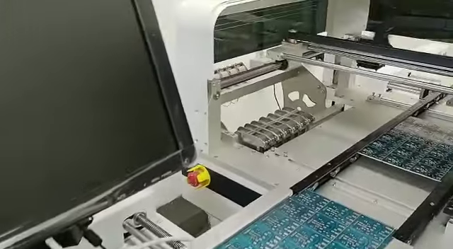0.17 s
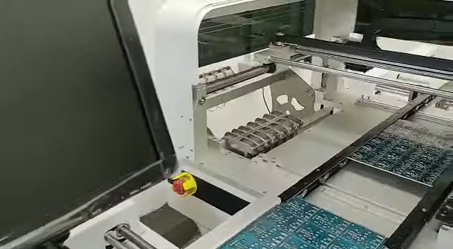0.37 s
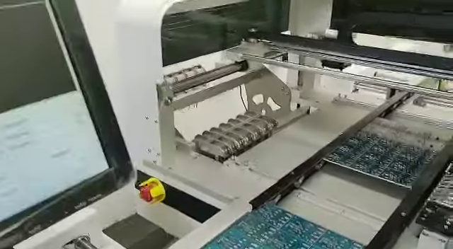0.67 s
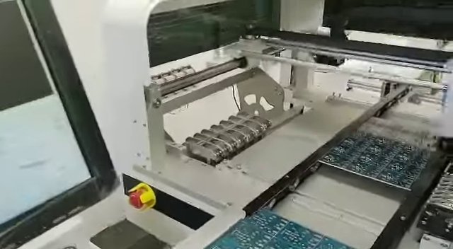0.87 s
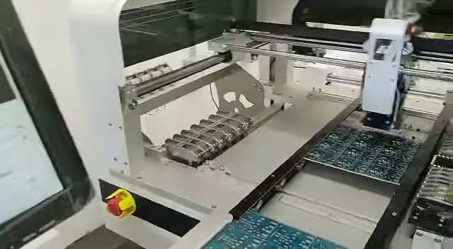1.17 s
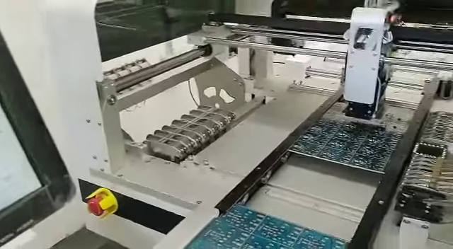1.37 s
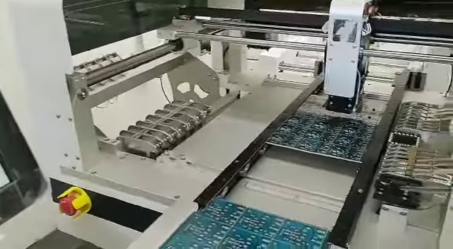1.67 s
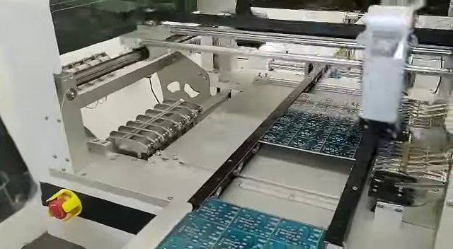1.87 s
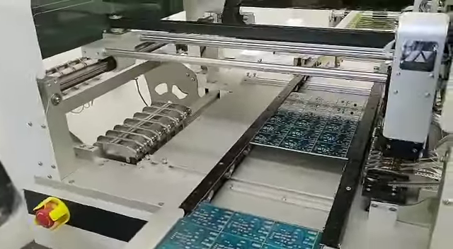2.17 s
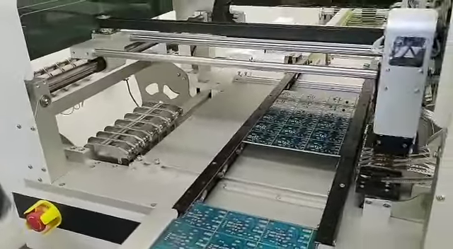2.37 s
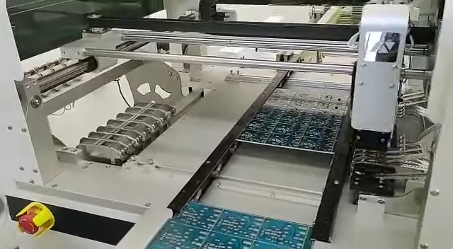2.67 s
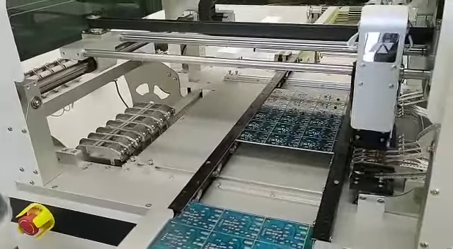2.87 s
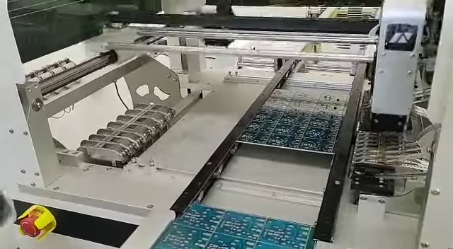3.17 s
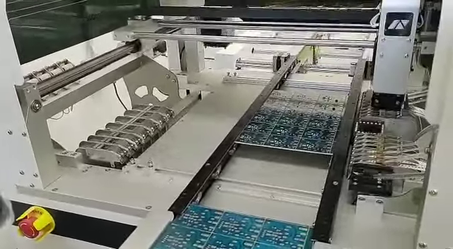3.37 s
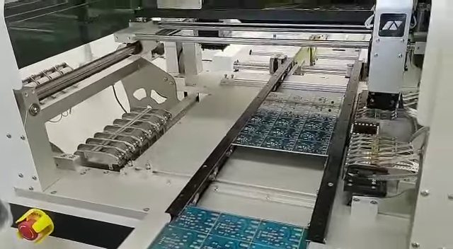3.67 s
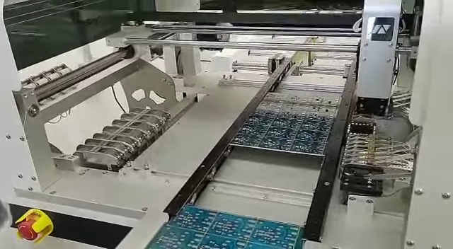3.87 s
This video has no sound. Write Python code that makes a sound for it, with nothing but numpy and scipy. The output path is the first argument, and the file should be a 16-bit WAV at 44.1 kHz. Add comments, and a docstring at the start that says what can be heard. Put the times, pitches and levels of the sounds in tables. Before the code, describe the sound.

A pick-and-place machine whirs through quick moves, with jolts and ratcheting rattles.

```python
"""A pick-and-place machine at work in a live workshop, on one microphone at its open front.
Its head makes five quick moves: the belt drive whines up and down, the guide bearings roll, and the
frame booms whenever the whine sweeps through its low resonances. Hard starts and stops jolt the head,
and braking groans. Twice a ratchet parts feeder rattles. Suction nozzles hiss, small valves tick,
and fans hum in the background."""
import sys
import numpy as np
from scipy import signal
from scipy.fft import rfft, irfft, next_fast_len
from scipy.io import wavfile
from scipy.ndimage import map_coordinates

SR = 44100
rng = np.random.default_rng(int(sys.argv[2]) if len(sys.argv) > 2 else 0)


def output_pcm(signal):
    """Save a mono or channel-first signal as 16-bit PCM at the path in sys.argv[1].

    Samples are clipped to [-1, 1] before scaling.
    """
    pcm = np.clip(np.atleast_2d(signal).T, -1, 1) * 32767
    wavfile.write(sys.argv[1], SR, np.round(pcm).astype(np.int16))


N = 176400
T = np.arange(N) / SR

# head moves (start [s], length [s], top belt-tooth rate [Hz], whine [dB], its lift in braking [dB],
# rolling [dB], frame boom [dB], swish [dB])
MOVES = [(-.112, .35, 1320, -44.5, -1, -43, -36.5, -71.5), (.855, .28, 1102, -49, 2, -46.5, -37, -69.5),
         (1.69, .54, 1642, -40.5, 3.5, -41.5, -36.5, -67.5),
         (3.054, .55, 1723, -38, 2, -40.5, -35.5, -67.5), (3.86, 0.36, 1535, -41, 0, -40, -31, -59)]


def amp(db):
    """Decibels to gain."""
    return 10 ** (np.asarray(db) / 20)


def unit(x):
    """Scale to rms 1."""
    return x / np.sqrt(np.mean(x ** 2) + 1e-20)


def along(points, hz):
    """Read (frequency [Hz], value) points on a log axis."""
    freqs, values = np.transpose(points)
    return np.interp(np.log(hz + 1), np.log(freqs + 1), values)


def wobble(rate):
    """A smooth random curve, rate knots a second."""
    return map_coordinates(rng.standard_normal(int(N * rate / SR) + 4), [T * rate])


def filtered(x, response):
    """x through a complex frequency response."""
    size = next_fast_len(N + SR // 2)
    return irfft(rfft(x, size) * response(np.fft.rfftfreq(size, 1 / SR)), size)[:N]


def coloured(x, points):
    """x through a (frequency [Hz], gain [dB]) curve."""
    return filtered(x, lambda hz: amp(along(points, hz)))


def noise(points):
    """Coloured noise of rms 1."""
    return unit(coloured(rng.standard_normal(N), points))


def resonate(x, modes):
    """x through a body's resonances (centre [Hz], width [Hz], gain [dB])."""
    return filtered(x, lambda f: sum(amp(db) * 1j * f * width / (hz * hz - f * f + 1j * f * width)
                                     for hz, width, db in modes))


def progress(start, length):
    """Ramp from 0 to 1 over an event."""
    return np.clip((T - start) / length, 0, 1)


def in_room(x, wet_db):
    """Direct sound plus the workshop's tail 4 ms behind it, at about the same total power."""
    # the workshop's decay (frequency [Hz], t60 [s])
    decay = [(100, 0.93), (250, 0.87), (1500, 1), (3000, 0.93), (7000, 0.6)]
    hz, t, spectrum = signal.stft(rng.standard_normal(SR), SR, nperseg=256)
    tail = signal.istft(spectrum * amp(-60 * t / along(decay, hz)[:, None]), SR, nperseg=256)[1]
    wet = signal.fftconvolve(x, np.pad(tail, (SR // 250, 0)) / np.linalg.norm(tail))[:N]
    return (x + amp(wet_db) * wet) / np.hypot(1, amp(wet_db))


def fans(rush_db=-53.5, waver_db=3.5, drift_rad=0.61):
    """Room tone: steady ventilation noise with unsteady motor lines."""
    # rush of the fans (frequency [Hz], relative level [dB])
    rush = [(15, -64.5), (25, -39.5), (82, -10), (209, -8), (242, -9.5), (392, -19), (431, -18),
            (605, -22.5), (650, -15.5), (699, -17), (890, -21.5), (1790, -30), (3700, -40), (8000, -55),
            (10400, -62), (17600, -120)]
    # motor lines (frequency [Hz], level [dB])
    hum = [(145, -60), (167, -60.5), (188, -64), (237, -57)]
    lines = sum(amp(db + waver_db * wobble(10)) * np.sin(2 * np.pi * hz * T + drift_rad * wobble(10.27))
                for hz, db in hum)
    return amp(rush_db) * noise(rush) + np.sqrt(2) * lines


def leak():
    """Leaking air: a narrow, high hiss swells and fades."""
    # the thin jet (start [s], length [s], centre [Hz], width [Hz], level [dB])
    jet = (1.7, 2.1, 7452.5, 451, -84.5)
    start, length, hz, width_hz, db = jet
    band = [(hz, width_hz, 0)]
    swell = np.sqrt(np.abs(np.sin(np.pi * progress(start, length))))
    return amp(db) * swell * unit(resonate(resonate(rng.standard_normal(N), band), band))


def nozzles(flicker_db=0.5):
    """Suction nozzles hiss, opening as parts are picked."""
    # course of the hiss (time [s], level [dB])
    flow = [(0, -82), (1.7, -76.5), (2.42, -61), (2.47, -49), (2.8, -46.5), (3.0, -51.5), (3.3, -41.5),
            (3.62, -52), (3.68, -48), (3.82, -46), (3.9, -39), (4, -39)]
    # its spectrum (frequency [Hz], relative level [dB])
    colour = [(25, -56), (150, 4), (400, 2.5), (1000, -4), (1450, 5), (1900, -8), (2400, -3), (2770, -4),
              (3100, -10), (3800, -12.5), (6000, -20), (7800, -31)]
    return amp(np.interp(T, *np.transpose(flow)) + flicker_db * wobble(150)) * noise(colour)


def valves(relative_width=0.36):
    """Small valves click: short bursts of band noise with little room on them."""
    # clicks (time [s], level [dB], centre [Hz], t60 [s])
    ticks = [(1.525, -58, 5910, 0.033), (1.643, -60, 3230, 0.024), (1.682, -59.5, 3000, 0.052),
             (1.735, -60.5, 4500, 0.076), (1.748, -57.5, 4130, 0.041), (2.283, -58.5, 5000, 0.034),
             (2.886, -54, 7040, 0.023), (3.667, -56.5, 5000, 0.045), (3.758, -64, 5960, 0.027)]
    out = np.zeros(N)
    for start, db, hz, t60 in ticks:
        band = unit(resonate(rng.standard_normal(N), [(hz, relative_width * hz, 0)]))
        out += (T >= start) * amp(db - 60 * np.abs(T - start) / t60) * band
    return in_room(out, wet_db=-11.5)


def feeder(tooth_hz=41.6, ring_hz=1440, width_hz=175, scatter_s=.0004, spread_db=1.9, contact_s=0.0047):
    """Each ratchet tooth makes three contacts that click, scrape and ring the feeder's metal."""
    # feeder runs (start [s], length [s], first level [dB], last level [dB])
    runs = [(2.437, .385, -41, -39.5), (3.058, .36, -38, -34)]
    # contacts of one tooth (position [share of the cycle], level [dB])
    contacts = [(0, 2), (0.332, -7.5), (0.702, -10)]
    # the metal's higher modes (centre [Hz], width [Hz], gain [dB])
    upper_modes = [(2745, 73, 3), (3380, 100, -4), (5080, 92, -16.5), (6250, 110, -15.5)]
    # broad clatter (frequency [Hz], relative level [dB])
    clatter_colour = [(25, -61), (80, 8), (170, 19), (300, 12), (500, 15), (1000, 14), (2000, -18),
                      (4000, -24), (7500, -31.5)]
    # the pawl's dry click (frequency [Hz], relative level [dB])
    pawl_colour = [(25, -59), (1500, -23.5), (3300, 12), (4500, -1), (6400, 2), (7800, -15)]
    main_mode = [(ring_hz, width_hz, 0)]
    contact_decay = np.exp(-T[:SR // 40] / contact_s)
    metal, clicks = np.zeros((2, N))
    for start, length, first_db, last_db in runs:
        blows = np.zeros(N)
        for share, db in contacts:
            times = start + (np.arange(round(length * tooth_hz)) + share) / tooth_hz
            timing, strength = rng.standard_normal((len(times), 2)).T
            blows[((times + scatter_s * timing) * SR).astype(int)] += amp(db + spread_db * strength)
        scrape = signal.fftconvolve(blows, contact_decay)[:N] * rng.standard_normal(N)
        snap = signal.fftconvolve(blows ** 2, contact_decay)[:N] * rng.standard_normal(N)
        ring = unit(resonate(resonate(blows, main_mode), main_mode))
        upper_ring = amp(-16) * unit(resonate(scrape, upper_modes))
        clatter = amp(-10.5) * unit(coloured(scrape, clatter_colour))
        grip = np.clip(0.43 + (T - start) / 0.11, 0, 1)  # the drive takes hold
        level = amp(np.interp(T, [start, start + length], [first_db, last_db]))
        drive = grip * np.sqrt(length * SR / N) * level  # the root refers the rms to the run's length
        metal += drive * (ring + upper_ring + clatter)
        clicks += drive * amp(-24) * unit(coloured(snap, pawl_colour))
    return clicks + in_room(metal, wet_db=-4)


def gantry(waver_db=2):
    """The gantry and its rail ring in brief swells around a stop."""
    # shudders (start [s], length [s], pitch [Hz], level [dB])
    shudders = [(1.024, 0.45, 105.6, -50.5), (1.06, 0.03, 400, -38.5), (1.18, 0.048, 1025, -40),
                (1.532, 0.1, 94.6, -62), (3.525, 0.02, 435, -29)]
    ring = sum(amp(db) * np.sin(np.pi * progress(start, length)) * np.sin(2 * np.pi * hz * T)
               for start, length, hz, db in shudders)
    return in_room(ring * amp(waver_db * wobble(25.9)), wet_db=-14.5)


def jolts(flutter_db=3):
    """A hard start or stop rattles the head's loose parts."""
    # jolts (time [s], level [dB], t60 [s])
    knocks = [(0.937, -42.5, 0.034), (1.062, -36, 0.16), (1.106, -34, 0.16), (1.167, -41, .15),
              (3.524, -43, 0.14)]
    # modes of the loose parts (centre [Hz], width [Hz], gain [dB])
    modes = [(306, 17, 0.5), (440, 60, -13.5), (655, 99, -7.5), (769, 59, -3), (954, 110, 1.5),
             (1460, 570, -9), (1850, 53, 0), (2370, 900, -31)]
    # dulling of the rattle (frequency [Hz], gain [dB])
    dulling = [(25, -14.5), (200, 8.5), (2600, -6.5), (4000, -26), (8000, -48)]
    force = sum((T >= start) * amp(db - 60 * np.abs(T - start) / t60) for start, db, t60 in knocks)
    rattle = unit(coloured(resonate(rng.standard_normal(N), modes), dulling))
    return in_room(force * amp(flutter_db * wobble(204.7)) * rattle, wet_db=0.5)


def braking_groans(from_hz=480, sink_s=.036, swell_s=0.076, jitter=.09, rough_db=2):
    """Braking groans: a tone sinks onto a low resonance of the frame, swells and rings out."""
    # groans (start [s], level [dB], t60 [s], final pitch [Hz])
    groans = [(.172, -31.5, 0.52, 231.4), (1.058, -34.5, 0.18, 279.2), (2.118, -37, 0.13, 240),
              (3.508, -32, 0.34, 238.4)]
    out = np.zeros(N)
    for start, db, t60, end_hz in groans:
        age = np.maximum(T - start, 0)
        hz = end_hz + (from_hz - end_hz) * np.exp(-age / sink_s)
        swell = np.minimum(age / swell_s, 1) * amp(db - 60 * np.maximum(age - swell_s, 0) / t60)
        out += swell * np.sin(2 * np.pi * np.cumsum(hz * (1 + jitter * wobble(120))) / SR)
    return in_room(out * amp(rough_db * wobble(51)), wet_db=-9.0)


def head_speed(start, length, rounding=.45):
    """Share of top speed during a move: accelerate, then brake."""
    done = progress(start, length)
    triangle = 1 - np.abs(2 * done - 1)
    return np.abs(rounding * np.sin(np.pi * done) + (1 - rounding) * triangle)


def under_way(speed):
    """Gate that opens once the head is moving."""
    return np.clip(8 * speed - .5, 0, 1)


def belt_swish():
    """The belt stirs the air, louder with speed."""
    # stirred air (frequency [Hz], relative level [dB])
    colour = [(25, -62), (2500, -29), (4200, 7.5), (6000, -0.5), (7400, 2), (8200, -10.5)]
    level = sum(amp(db) * np.sqrt(head_speed(start, length)) for start, length, *_, db in MOVES)
    return in_room(level * noise(colour), wet_db=0.5)


def bearings(growth=0.86, rise_db=4.5, grain_db=3.5):
    """The guide bearings' grainy roll grows with speed and is louder late in a move."""
    # rolling noise (frequency [Hz], relative level [dB])
    colour = [(25, -58), (60, -8), (150, -18.5), (230, 6), (330, -9), (450, -10), (600, -6), (1000, -4.5),
              (1450, -5), (2000, -6), (2700, -11.5), (3700, -28.5), (5500, -34.5), (7500, -61)]
    level = np.zeros(N)
    for start, length, *_, roll_db, _, _ in MOVES:
        speed = head_speed(start, length)
        late = progress(start, length) - .5
        level += amp(roll_db + rise_db * late) * under_way(speed) * speed ** growth
    return in_room(level * noise(colour) * amp(grain_db * wobble(220)), wet_db=0.5)


def frame_boom(shake):
    """The shaken frame booms at its low resonances."""
    # frame resonances (centre [Hz], width [Hz], gain [dB])
    modes = [(245.6, 24, 1.5), (301, 38, -2), (436.6, 46, -6)]
    # what the frame radiates (frequency [Hz], gain [dB])
    radiation = [(25, -19), (100, -6.5), (180, 1.5), (500, -1.5), (1500, -6.5), (4000, -23), (8000, -37)]
    return in_room(coloured(resonate(shake, modes), radiation), wet_db=-1)


def belt_drive(growth=1.3, jitter=.017, flutter_db=4, sweep_gain=4.2, judder_gain=7.04):
    """The belt whines at its tooth rate, which follows the head's speed and shakes the frame."""
    # partials of the whine (order [multiple of the tooth rate], level [dB])
    orders = [(.5, -18.5), (1, 3), (2, -0.5), (3, -3.5)]
    # colour of the whine (frequency [Hz], gain [dB])
    colour = [(30, -38.5), (100, -14.5), (400, -2), (700, -5), (1000, 0), (1250, -1), (1500, 1),
              (1700, 2.5), (2000, 7.5), (2450, -3), (3000, -11.5), (3500, -23.5), (6000, -27)]
    whine, shake = np.zeros((2, N))
    for start, length, top_hz, whine_db, lift_db, _, boom_db, _ in MOVES:
        speed = head_speed(start, length)
        late = progress(start, length) - .5
        braking = np.tanh(20 * late - 1)  # -1 while speeding up, 1 while slowing down
        phase = 2 * np.pi * np.cumsum(top_hz * speed * (1 + jitter * wobble(250))) / SR
        tone = sum(amp(db + flutter_db * wobble(80)) * np.sin(order * phase) for order, db in orders)
        whine += amp(whine_db + lift_db * braking) * speed ** growth * tone
        sweep = sweep_gain * (1 - speed) ** 4 * np.sin(phase)  # strongest at low speed
        judder = judder_gain * rng.standard_normal(N)
        shake += amp(boom_db) * under_way(speed) * (sweep + judder)
    return in_room(coloured(whine, colour), wet_db=-2.5) + frame_boom(shake)


def scene():
    """The whole machine in mono, heard from its open front."""
    background = fans() + leak() + nozzles() + valves()
    starts_and_stops = gantry() + jolts() + braking_groans()
    travel = belt_swish() + bearings() + belt_drive()
    return (background + feeder() + starts_and_stops + travel)[None]


def record(dry, top_hz=8050):
    """The microphone's band ends steeply in the treble."""
    return filtered(dry[0], lambda hz: 1 / np.sqrt(1 + (hz / top_hz) ** 120))[None]


dry = scene()
out = record(dry)
output_pcm(out)
```